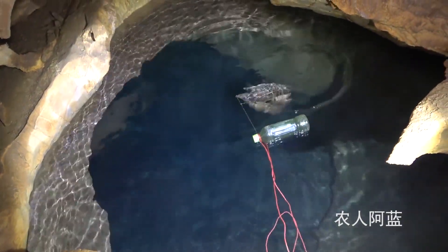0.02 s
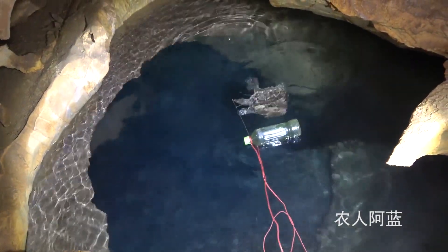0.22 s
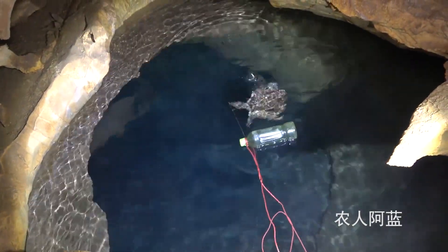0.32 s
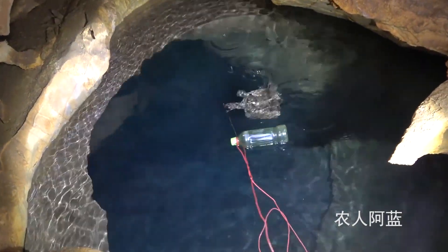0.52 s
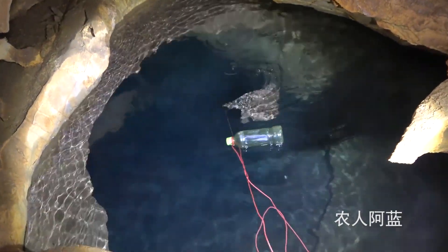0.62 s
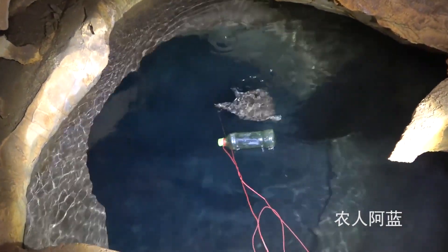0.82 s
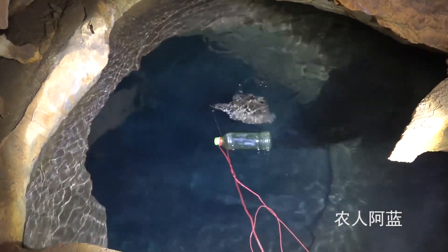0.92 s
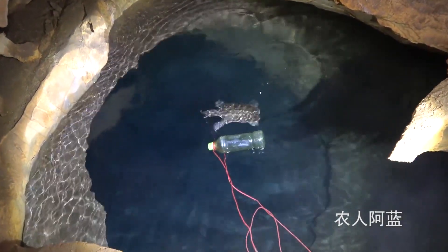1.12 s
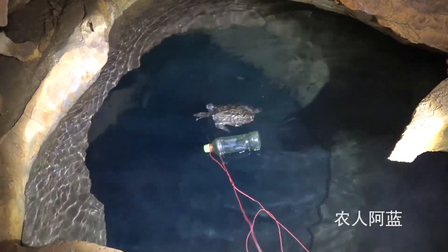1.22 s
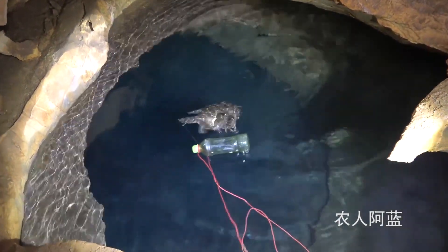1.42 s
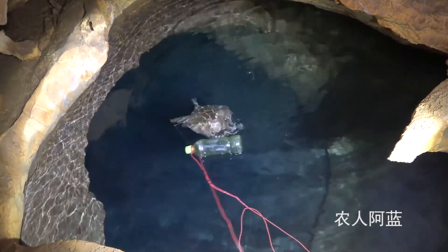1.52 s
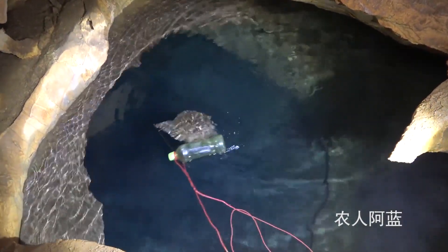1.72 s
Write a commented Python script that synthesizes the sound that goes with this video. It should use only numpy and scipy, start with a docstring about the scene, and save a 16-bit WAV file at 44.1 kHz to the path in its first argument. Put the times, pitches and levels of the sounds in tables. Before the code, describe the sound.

Drops plink and gulp in a rocky pool, close echoes around, over faint hush and whine

```python
"""First a low hush and a very high, thin whine, then drips and plops in a small rock pool inside a cave.
Drops tick on the surface as short noise bursts; trapped bubbles ring as decaying, gliding sines.
A larger splash gulps air and breaks into swarms of tiny bubbles; the water laps as dull noise.
Close rock walls answer each water sound with near reflections and a short dense tail.
Tiny drips are scattered around the pool's edge; the hush is shaped noise, the whine one steady tone."""
import sys
import numpy as np
from scipy import signal
from scipy.fft import rfft, irfft
from scipy.io import wavfile

SR = 44100
rng = np.random.default_rng(int(sys.argv[2]) if len(sys.argv) > 2 else 0)


def wav_out(sig):
    """Save sig, one row per channel (or a flat mono array), as 16-bit PCM at SR to the path in sys.argv[1]."""
    wavfile.write(sys.argv[1], SR, np.round(np.clip(np.atleast_2d(sig).T, -1, 1) * 32767).astype(np.int16))


N = 79380  # 1.8 s
AGE = np.arange(SR // 2) / SR  # time since an event began (s)


def bubble(hz, db, t60, climb, rise_s):
    """A trapped bubble rings as a sine; its pitch glides by climb octaves/s until t60, then holds."""
    pitch = hz * 2 ** (climb * np.minimum(AGE, t60))
    ring = np.sin(2 * np.pi * np.cumsum(pitch) / SR)
    return amp(db) * envelope(rise_s, t60) * ring


# Small ringing bubbles in the pool; a negative glide falls, echo is relative to the direct sound
# t/s, f/Hz, level/dB, attack/s, ring t60/s, glide/(octaves/s), left-right/dB, echo/dB
SMALL_BUBBLES = [ (0.2367, 4660, -40.5, 0.0006, 0.0089, 6, -1, 16.5),
                 (.2390, 5460, -27.5, 0.00056, 0.0033, -5, 5.5, 3),
                 (0.341, 1920, -45.5, 0.00084, 0.027, 6, 2.5, 1),
                 (.3460, 11760, -61, 0.0017, 0.018, 1, 2.5, 2),
                 (.3790, 7280, -57.5, 0.0019, 0.012, -4, 12, 4),
                 (0.393, 7580, -47.5, .002, 0.022, 0.5, 4, -1),
                 (.4470, 3580, -48, 0.0012, 0.035, -10.5, 2.5, 2),
                 (.4645, 3522, -39.5, 0.0052, 0.02, -1.5, 0.5, 0),
                 (0.483, 1397, -43, 0.0043, 0.039, -1.5, 1.5, 5.5),
                 (0.492, 2290, -48, .004, .03, 0.5, -2, -2),
                 (0.4937, 5700, -51, 0.0018, 0.066, 1.5, 2, 2.5),
                 (0.4947, 7180, -53.5, 0.0012, 0.022, 3.5, 3, 6.5),
                 (.5220, 2155, -43.5, 0.0014, 0.061, -1.5, 1.5, -4),
                 (0.5249, 1562, -39.5, 0.0024, 0.033, 8.5, -4.5, -1.5),
                 (0.532, 1300, -43, 0.0041, 0.016, 5, -1, 4), (0.572, 1650, -53, 0.0072, .09, 2, -4, 1.5),
                 (0.5802, 4580, -30, 0.00084, 0.006, -2, -.5, 7.5),
                 (0.7438, 2452, -47.5, 0.00022, 0.066, 2.6, -3.5, 6.5),
                 (1.5450, 2640, -50.5, 0.001, 0.014, 6, -4, 0), (1.563, 4710, -52.5, .001, 0.06, 0.5, 1, 3),
                 (1.5811, 8090, -32.5, 0.00036, 0.0083, 5, 2.5, -2.5),
                 (1.584, 3350, -43, 0.00095, 0.0077, -11, -2, 0),
                 (1.585, 1229, -47.5, 0.012, 0.056, 3, -3.5, 3),
                 (1.5900, 2090, -46, 0.017, 0.062, -1.5, -3, -11),
                 (1.594, 5450, -54, .001, 0.036, -5, 6, 3), (1.623, 1084, -53, 0.0046, 0.069, -10, -2, 0.5),
                 (1.6637, 2640, -45, 0.0022, 0.0065, 0, -0.5, 5.5),
                 (1.6665, 2337, -37, 0.0005, 0.035, -5, 2, -1.5), ]
# Large air pockets under the surface
# t/s, f/Hz, level/dB, attack/s, ring t60/s, glide/(octaves/s), left-right/dB, echo/dB
AIR_POCKETS = [ (0.4101, 275.8, -43, 0.0021, 0.49, 3.32, -2.5, -1),
               (0.441, 481, -39.5, 0.0074, 0.07, 2, 5.5, 1),
               (.4545, 564.7, -24, 0.0056, 0.068, 8.5, 5.5, -7),
               (.4630, 727.5, -27.5, 0.01, 0.017, 4, 0, 1.5), (0.467, 320, -37, 0.0029, 0.037, -3.5, 2, -8),
               (.4750, 558.5, -32.5, 0.0032, .16, 0, -1.5, -8),
               (.4860, 646, -31.5, 0.0032, 0.073, 7, -3, -23), (.4990, 618, -36, 0.011, 0.025, 3.5, -3, -8),
               (.5100, 412, -41.5, 0.0084, 0.063, -0.5, -4, -10),
               (0.632, 65.5, -59, 0.014, 0.27, 2, 0, -11), (1.259, 290, -54.5, 0.0087, 0.061, 4.5, 5, 3), ]


def bubbles():
    """Small bubbles plink brightly; large air pockets plop round and low."""
    out = np.zeros((2, N))
    for s, hz, db, rise_s, t60, climb, pan_db, echo_db in AIR_POCKETS + SMALL_BUBBLES:
        ring = bubble(hz, db, t60, climb, rise_s)
        add(out, s, cave(ring, echo_db, pan_db))
    return out


# Swarms of tiny bubbles in a splash, the level being the middle for one bubble
# t/s, length/s, lowest f/Hz, highest f/Hz, level/dB, left-right/dB
BUBBLE_SWARMS = [ (.484, .06, 1060, 1720, -46, -4), (.490, 0.063, 2000, 4680, -51, -0.5),
                 (0.55, .075, 1106, 1920, -55, -1.5), (0.751, 0.013, 2660, 3410, -51.5, -2),
                 (1.578, 0.029, 1810, 2650, -48.5, 2), (1.583, .03, 1030, 1380, -55, -1),
                 (1.590, 0.075, 1410, 3900, -57.5, -1), ]
SWARM_PER_S, SWARM_SPREAD_DB, SWARM_ECHO_DB = 150, 4.5, 3
SWARM_RISE_S, SWARM_T60, SWARM_CLIMB = 0.00059, 0.013, 10.5  # s, s, octaves/s


def gurgles():
    """Splashes break into swarms of short, chirping bubbles with random pitch and strength."""
    out = np.zeros((2, N))
    for s, length, low_hz, high_hz, db, pan_db in BUBBLE_SWARMS:
        count = max(round(SWARM_PER_S * length), 1)
        swarm = np.zeros((1, len(AGE)))
        for k, (when, size, strength) in enumerate(rng.random((count, 3))):
            hz = low_hz * (high_hz / low_hz) ** size
            blip_db = db + SWARM_SPREAD_DB * (strength - .5)
            blip = bubble(hz, blip_db, SWARM_T60, SWARM_CLIMB, SWARM_RISE_S)
            add(swarm, length * (k + when) / count, blip[None])
        add(out, s, cave(swarm[0], SWARM_ECHO_DB, pan_db))
    return out


# Drops striking the pool: bands of noise, 9 dB down one width from the centre
# t/s, centre f/Hz, width/octaves, level/dB, t60/s, left-right/dB, echo/dB
DROP_IMPACTS = [ (0.237, 6600, 0.65, -42, 0.036, 2.5, -0.5), (.3370, 2800, 1.2, -58, 0.015, -2, 11),
                (0.4123, 5160, 0.81, -40, 0.014, 0.5, 6.5), (0.4142, 11700, 0.33, -34.5, 0.015, 3, -2),
                (.5815, 5640, 0.63, -34, 0.011, 2.5, 0), (0.607, 4100, 0.49, -44.5, 0.02, -2.5, 5),
                (0.7426, 5380, 2.4, -45, 0.014, 2.5, 3.5), (0.871, 7400, 0.56, -74, 0.11, 2, 16),
                (0.959, 4740, 1.4, -59, 0.059, -3, -25), (1.051, 6200, 0.41, -61, .04, 1, 0),
                (1.421, 8500, 0.47, -56, 0.025, 2, 8), (1.5639, 6230, .5, -45.5, 0.0087, 5, 0),
                (1.5746, 4900, 1.5, -51.5, 0.027, 2, 6.5), (1.5810, 2350, .3, -51.5, 0.027, -7, -8),
                (1.583, 6740, 1.5, -41, 0.0049, -4, -2.5), (1.6664, 3700, 1.15, -46.5, 0.01, 0.5, 2.5),
                (1.7273, 9500, 0.34, -45.5, 0.0063, 2, -5), (1.7370, 3530, 0.43, -51, 0.011, -1, -1), ]
TICK_RISE_S = 0.00033


def impacts():
    """Each drop slaps the surface with a brief tick of band-limited noise."""
    out = np.zeros((2, N))
    for s, hz, width, db, t60, pan_db, echo_db in DROP_IMPACTS:
        burst = noise(len(AGE), lambda f: -30 * np.log10(1 + (np.log2((f + 1) / hz) / width) ** 2))
        tick = amp(db) * envelope(TICK_RISE_S, t60) * burst
        add(out, s, cave(tick, echo_db, pan_db))
    return out


# Soft laps of the pool water
# t/s, level/dB, t60/s, left-right/dB
WATER_LAPS = [(.410, -53, 0.36, -0.5), (1.257, -53, 0.19, 3), (1.312, -56.5, 0.27, 3.5),
              (1.736, -58.5, 0.44, 1)]
# Dull spectrum of a lap, relative
# f/Hz, level/dB per Hz
LAP_SPECTRUM = [(40, -25), (100, -21), (160, 2.5), (330, -3), (600, -8.5), (1300, -12), (2500, -18),
                (5000, -22.5), (14000, -69)]
LAP_RISE_S = 0.0044


def laps(echo_db=-3):
    """Dull sloshes of noise as the surface folds over."""
    out = np.zeros((2, N))
    for s, db, t60, pan_db in WATER_LAPS:
        water = noise(len(AGE), lambda f: read(LAP_SPECTRUM, f))
        slosh = amp(db) * envelope(LAP_RISE_S, t60) * water
        add(out, s, cave(slosh, echo_db, pan_db))
    return out


FAR_DRIPS_PER_S, FAR_DRIP_DB, DRIP_RISE_S = 8.2, -65.5, 0.0028


def far_drips(low_hz=4500, high_hz=11000, t60=0.0046, spread_db=3, echo_db=4):
    """Tiny ringing drips at random times and sides around the pool's edge."""
    out = np.zeros((2, N))
    count = round(FAR_DRIPS_PER_S * N / SR)
    for when, size, strength, side in rng.random((count, 4)):
        hz = low_hz * (high_hz / low_hz) ** size
        db = FAR_DRIP_DB + spread_db * (2 * strength - 1)
        drip = bubble(hz, db, t60, 2, DRIP_RISE_S)
        add(out, when * N / SR, cave(drip, echo_db, spread_db * (2 * side - 1)))
    return out


# First reflections from the close walls, levels within the echo
# delay t/s, level/dB
WALL_REFLECTIONS = [(.0017, -13), (.0046, -28), (.0088, -17.5), (0.0163, -7.5)]
# Time for the tail to die by 60 dB
# f/Hz, t60/s
TAIL_T60 = [(100, 0.67), (300, 0.46), (700, 0.17), (1500, 0.26), (4500, 0.21), (9000, 0.22), (16000, 0.31)]
# Width of the whole echo
# f/Hz, side-mid level/dB
ECHO_WIDTH = [(150, -12), (500, -26), (2000, -21), (4500, -22.5), (8000, -3), (14000, -10)]
TAIL_DB, TAIL_RISE_S = 9, 0.001  # tail level within the echo; time constant


def cave(sound, echo_db, pan_db):
    """A sound with its answer from the rock: a few near reflections and a short dense tail."""
    hz, t, grid = signal.stft(rng.standard_normal((2, len(AGE))), SR, nperseg=256)
    decay = amp(-60 * t / read(TAIL_T60, hz)[:, None])
    tail = signal.istft(grid * decay, SR, nperseg=256)[1][:, :len(AGE)]
    tail = tail * (1 - np.exp(-AGE / TAIL_RISE_S))
    tail = amp(TAIL_DB) * tail / np.linalg.norm(tail[0])
    for delay, db in WALL_REFLECTIONS:
        # each delay varies by up to 15 %; walls answer in the middle only
        tail[0, round(delay * rng.uniform(.85, 1.15) * SR)] += amp(db)
    mid, side = signal.fftconvolve(sound[None], tail, axes=1)[:, :len(AGE)]
    direct_power = np.mean(sound ** 2)
    echo = stereo(unit(mid), unit(side), ECHO_WIDTH) * np.sqrt(direct_power)
    total_rms = np.sqrt(direct_power * (1 + amp(echo_db) ** 2))
    return pan(pan_db) * total_rms * unit(sound + amp(echo_db) * echo)


# Spectrum of the cave air, relative
# f/Hz, level/dB per Hz
AIR_SPECTRUM = [(25, -4.5), (50, -0.5), (70, 1), (105, 1), (180, -3), (260, -3), (350, -2), (440, -1),
                (590, -4.5), (780, 2.5), (900, -5), (1100, -1), (1300, -4.5), (1700, -13), (2400, -13),
                (4100, -15), (6200, -13), (10000, -15.5), (14000, -16)]
# Width of the cave air
# f/Hz, side-mid level/dB
AIR_WIDTH = [(40, -23), (130, -3.5), (300, -4), (700, -7.5), (1400, -8.5), (3000, -18), (6500, -2),
             (14000, -5)]
HUSH_DB, HUSH_PAN_DB = -61, 0.5  # rms of the mid, left-right difference


def hush():
    """The low, even hush of the cave air: steady shaped noise, spread in stereo."""
    mid, side = (noise(N, lambda f: read(AIR_SPECTRUM, f)) for _ in range(2))
    return pan(HUSH_PAN_DB) * amp(HUSH_DB) * stereo(mid, side, AIR_WIDTH)


# Level of the whine at each ear, before its waver
# t/s, left level/dB, right level/dB
WHINE_LEVELS = [(0, -49.5, -54), (.3, -52, -58), (.55, -50.5, -53), (.7, -48.5, -54.5), (1.0, -49, -56),
                (1.22, -47.5, -53), (1.45, -50, -56), (1.7, -50, -52.5), (1.8, -52, -56)]
WHINE_HZ, WHINE_WAVER_DB, WHINE_WAVER_HZ = 15685, .2, 6


def whine():
    """A thin electrical whine: one sine drifting in level at each ear, with a shared slight waver."""
    t = np.arange(N) / SR
    s, left, right = np.transpose(WHINE_LEVELS)
    level = np.array([np.interp(t, s, left), np.interp(t, s, right)])
    level = level + WHINE_WAVER_DB * drift(WHINE_WAVER_HZ)
    return amp(level) * np.sin(2 * np.pi * WHINE_HZ * t)


def envelope(rise_s, t60):
    """A smooth rise and an exponential decay."""
    rise = np.sin(np.pi / 2 * np.minimum(AGE / rise_s, 1)) ** 2
    return rise * amp(-60 * np.maximum(AGE - rise_s, 0) / t60)


def noise(size, colour):
    """Noise of rms 1 whose spectrum in dB is colour(hz)."""
    gain = amp(colour(np.fft.rfftfreq(size, 1 / SR)))
    return unit(irfft(rfft(rng.standard_normal(size)) * gain, size))


def drift(rate_hz):
    """Slow random wander of rms 1."""
    return noise(N, lambda f: -20 * np.log10(1 + (f / rate_hz) ** 2))


def stereo(mid, side, width):
    """Left and right from mid and side, the side weighted by a table of width."""
    gain = amp(read(width, np.fft.rfftfreq(len(side), 1 / SR)))
    side = irfft(rfft(side) * gain, len(side))
    return np.array([mid + side, mid - side])


def pan(db):
    """Left and right gains for a level difference."""
    return amp([[db / 2], [-db / 2]])


def amp(db):
    """Decibels to gain."""
    return 10 ** (np.asarray(db) / 20)


def unit(x):
    """Scales to rms 1."""
    return x / np.sqrt(np.mean(x ** 2) + 1e-20)


def read(points, hz):
    """Reads a table along a log-frequency axis."""
    f, value = np.transpose(points)
    return np.interp(np.log(hz + 1), np.log(f + 1), value)


def add(mix, s, sound):
    """Mixes a sound in at time s, cut at the end of the mix."""
    part = mix[:, max(round(s * SR), 0):][:, :sound.shape[1]]
    part += sound[:, :part.shape[1]]


def scene():
    """The pool in its cave."""
    water = bubbles() + gurgles() + impacts() + laps() + far_drips()
    return water + hush() + whine()


def record(dry):
    """The recorder's band limit: a steep low-pass at 16 kHz."""
    low_pass = signal.firwin(1023, 16000, window=("kaiser", 9), fs=SR)
    return signal.oaconvolve(dry, low_pass[None], "same")


dry = scene()
out = record(dry)
wav_out(out)
```